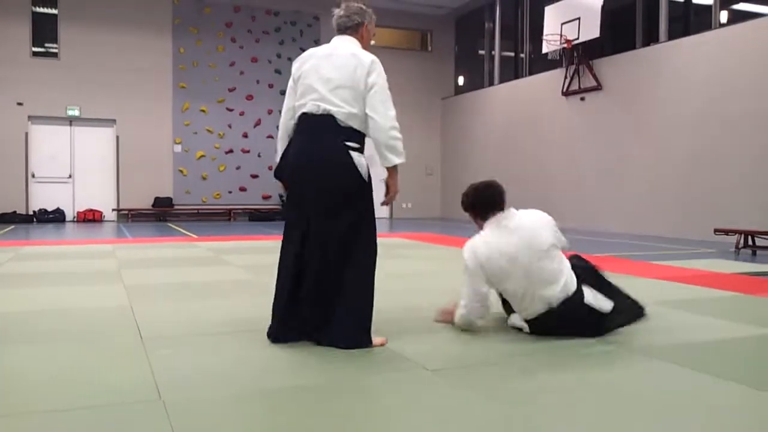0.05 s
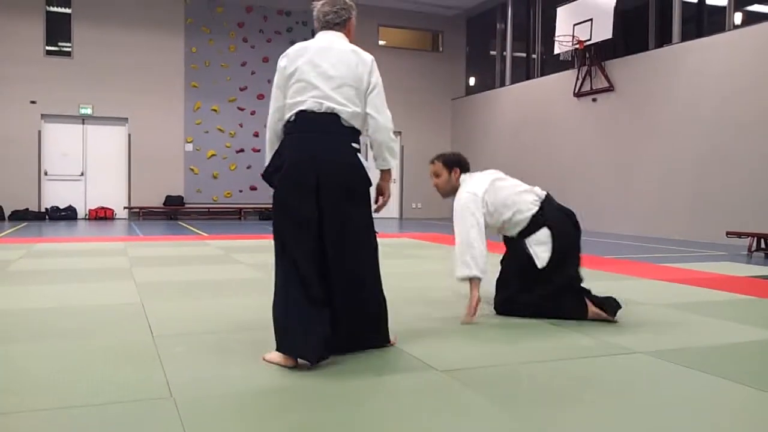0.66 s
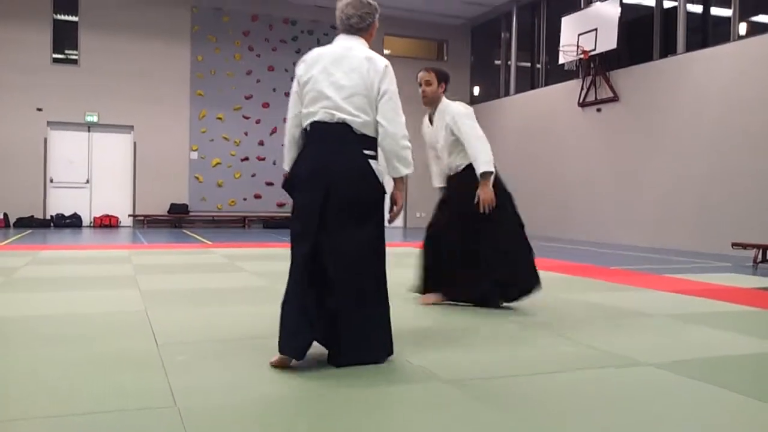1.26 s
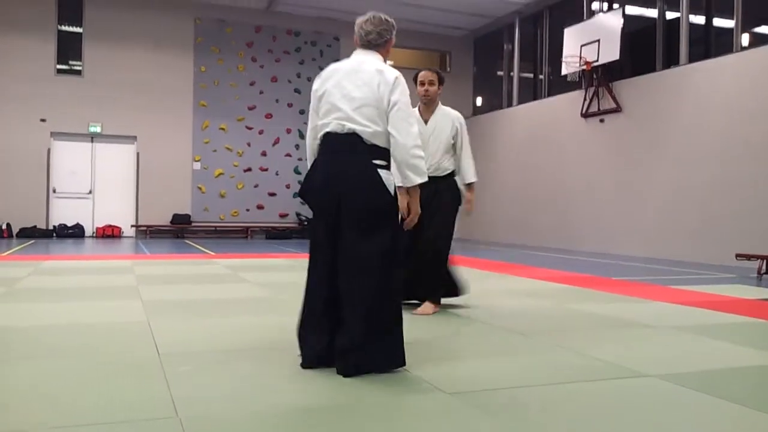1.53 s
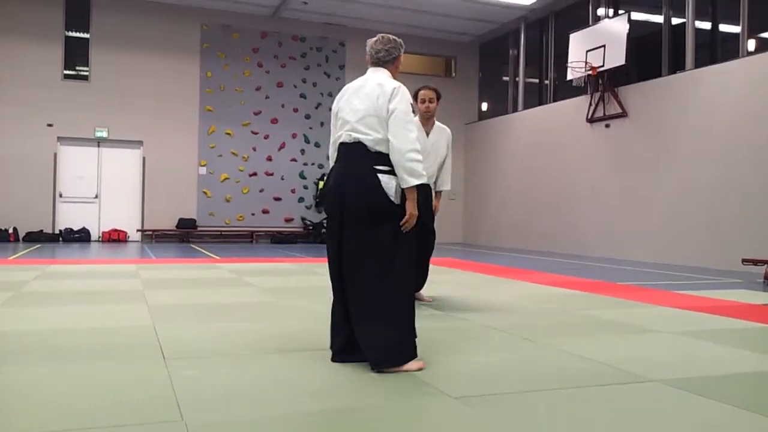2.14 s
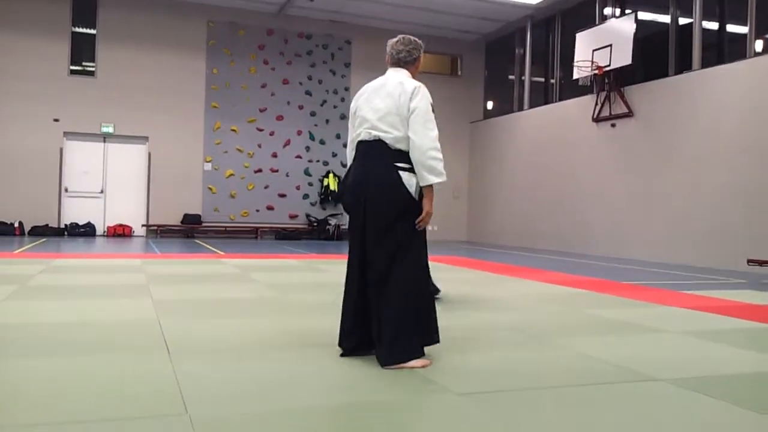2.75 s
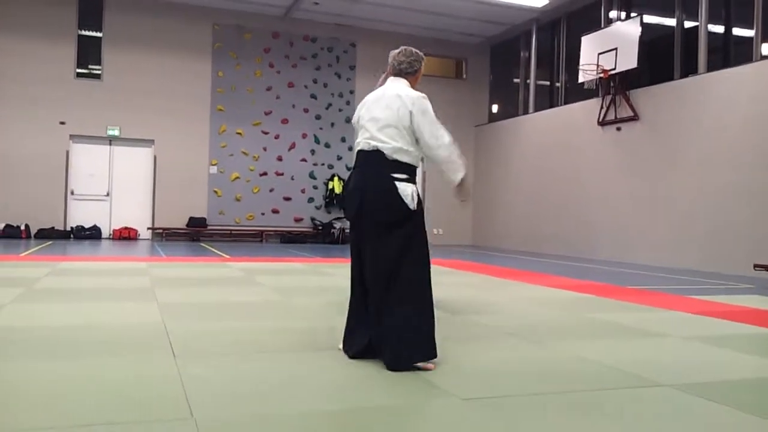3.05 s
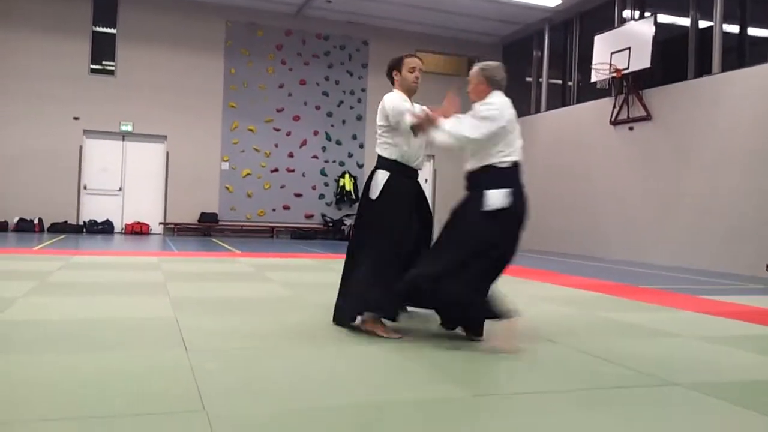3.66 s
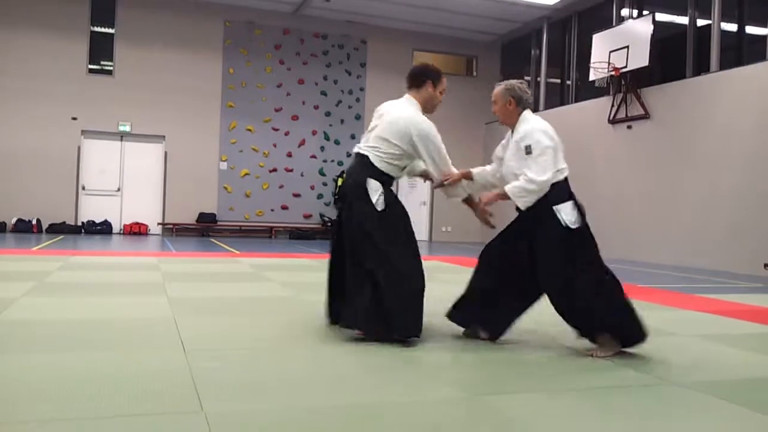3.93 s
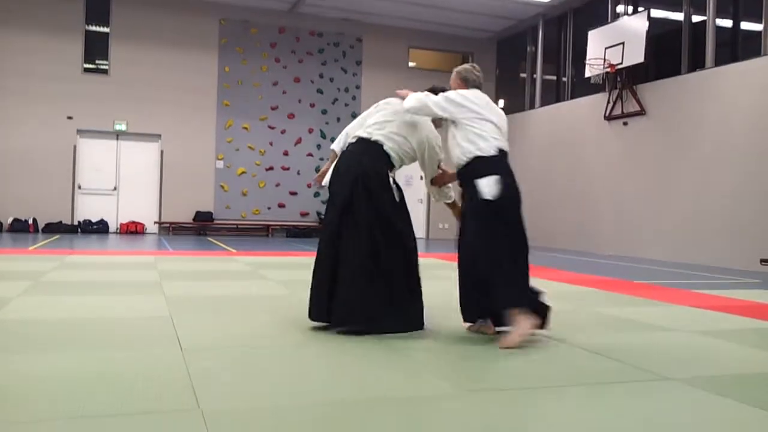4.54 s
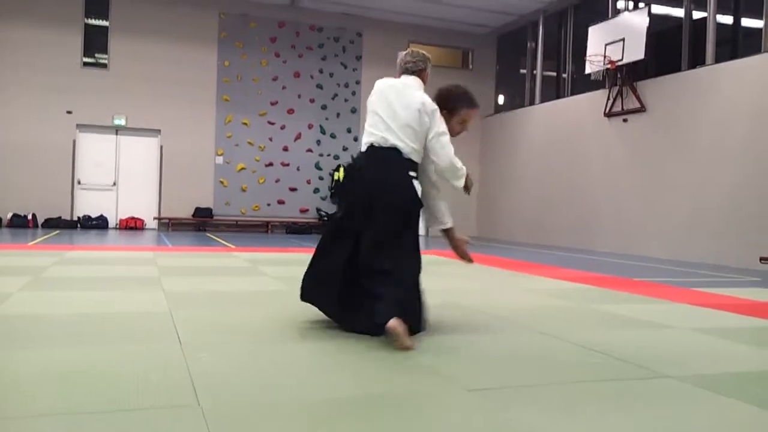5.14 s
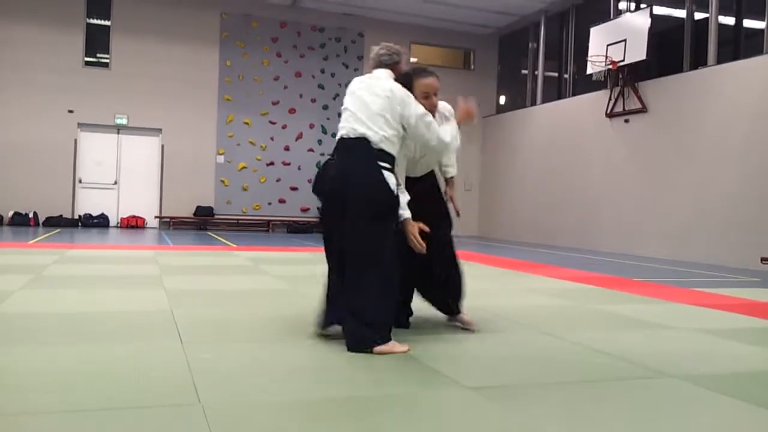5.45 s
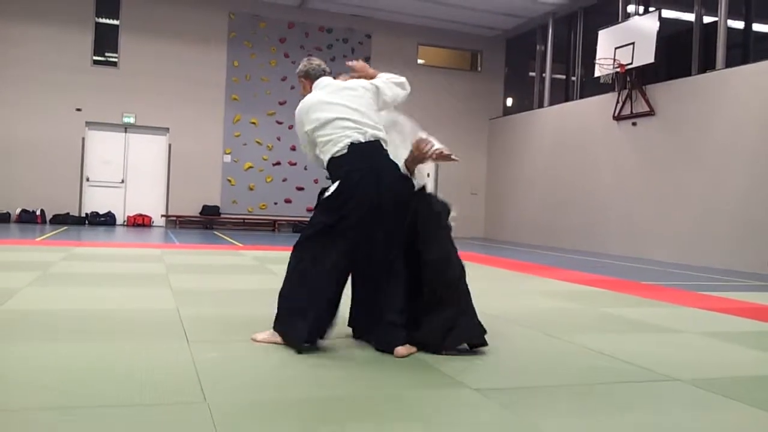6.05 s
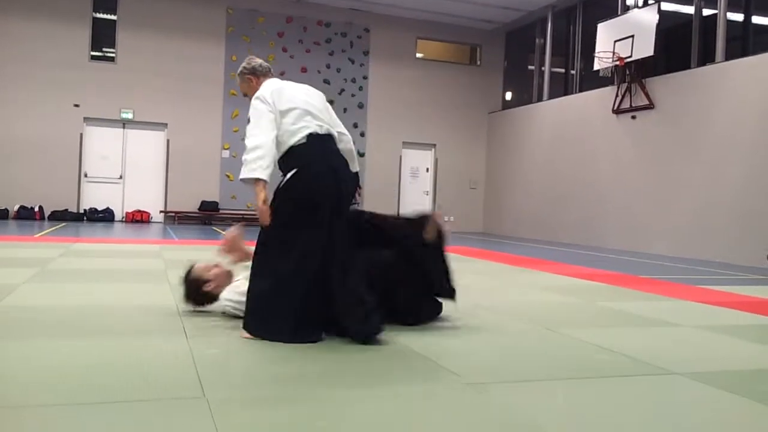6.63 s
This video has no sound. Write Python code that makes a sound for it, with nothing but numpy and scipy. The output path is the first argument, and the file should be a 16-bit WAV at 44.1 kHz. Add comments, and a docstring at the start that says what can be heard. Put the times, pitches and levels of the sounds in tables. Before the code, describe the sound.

Loose cloth swishes, bare feet scuff and bodies thud softly on mats as two people move and roll in a sports hall.

```python
"""A sports hall, where two people in loose training clothes move and roll on mats.
Sliding friction makes cloth swish and bare feet scuff; impacts give sharp ticks and soft thuds.
Beneath them lie the hiss of the ventilation and a rumble that swells as the bodies roll.
The two microphone ports of a hand-held camera colour it by resonance: the left one rings in the
top treble, the right one lower."""
import sys
import numpy as np
from scipy import signal
from scipy.fft import rfft, irfft, next_fast_len
from scipy.io import wavfile
from scipy.ndimage import uniform_filter1d, map_coordinates

SR = 44100
rng = np.random.default_rng(int(sys.argv[2]) if len(sys.argv) > 2 else 0)


def generate_wav(signal):
    """Clip the signal to [-1, 1] and save it as 16-bit WAV at the path in sys.argv[1]."""
    frames = np.transpose(np.atleast_2d(signal))
    scaled = np.clip(frames, -1, 1) * 32767
    pcm = np.round(scaled).astype(np.int16)
    wavfile.write(sys.argv[1], SR, pcm)


N = 299394
TIME = np.arange(N) / SR
# spectrum of a tick or a snapping crease: f/Hz, level/dB
CRACK_SPECTRUM = [(60, -15), (300, -7), (600, -2), (1200, -0.5), (2500, -1.5), (4000, -1), (5200, 5.5),
                  (7000, -2.5), (11300, 2), (14000, -1)]


def amp(db):
    """Amplitude ratio of a level in decibels."""
    return 10 ** (np.asarray(db) / 20)


def unit(x):
    """Normalisation to an rms of 1."""
    return x / np.sqrt(np.mean(x ** 2) + 1e-20)


def along(points, hz):
    """Interpolation of (f/Hz, value) points on a logarithmic frequency axis."""
    f, values = np.transpose(points)
    return np.interp(np.log(hz + 1), np.log(f), values)


def wobble(rate):
    """Random modulation: a smooth curve with rate knots a second."""
    return map_coordinates(rng.standard_normal(int(N * rate / SR) + 4), [TIME * rate])


def filtered(x, response):
    """Zero-phase filtering: the spectrum of x times a frequency response."""
    size = next_fast_len(N + SR // 2)
    return irfft(rfft(x, size) * response(np.fft.rfftfreq(size, 1 / SR)), size)[..., :N]


def coloured(x, points, size=4096):
    """Minimum-phase filtering by an (f/Hz, gain/dB) curve: ringing follows its cause."""
    gain = amp(along(points, np.fft.rfftfreq(size, 1 / SR)))
    cepstrum = irfft(np.log(gain))
    cepstrum[1:size // 2] *= 2
    cepstrum[size // 2 + 1:] = 0
    impulse_response = irfft(np.exp(rfft(cepstrum)))
    return signal.oaconvolve(x, impulse_response)[:N]


def gate(start, length, rise, fall):
    """Envelope of a sustained excitation: linear rise, plateau, exponential decay."""
    t = TIME - start
    return np.clip(t / rise + .5, 0, 1) * np.exp(-np.maximum(t - length, 0) / fall)


def blow(start, t60):
    """Envelope of a damped impact: a sudden onset, then 60 dB of decay in t60 seconds."""
    t = TIME - start
    return (t >= 0) * amp(-60 * np.clip(t / t60, 0, 2))


def sweep(start, rise, hold, fall):
    """Level follows speed: a movement gathers pace, slows a little and comes to rest."""
    flank_db, flank_bend, sag_db_per_s = 15, 1.16, 3.5
    t = TIME - start
    flanks = np.maximum(-t, 0) / rise + np.maximum(t - hold, 0) / fall
    return amp(-flank_db * np.minimum(flanks, 10) ** flank_bend - sag_db_per_s * np.clip(t, 0, hold))


def glide(rows, unsteady, wobble_rate, flicker_db):
    """Random frequency and amplitude modulation roughen a tone along (t/s, f/Hz, level/dB) rows."""
    times, pitches, levels = np.transpose(rows)
    hz, db = np.interp(TIME, times, pitches), np.interp(TIME, times, levels)
    phase = 2 * np.pi * np.cumsum(hz * (1 + unsteady * wobble(wobble_rate))) / SR
    sounding = gate(times[0], times[-1] - times[0], rise=0.026, fall=0.022)
    return sounding * amp(db + flicker_db * wobble(45)) * np.sin(phase)


def ports(pair):
    """Cavity resonance: the left microphone port peaks near 11 kHz, the right near 5 kHz."""
    # responses of the ports: f/Hz, gain/dB
    left_response = [(200, 2.5), (600, 0.5), (2000, -0.5), (4200, 1), (5500, -3.5), (7000, 3), (8500, 8),
                     (10000, 13.5), (11300, 19), (12500, 14), (14500, 8.5)]
    right_response = [(200, -2.5), (600, 0), (2000, 0), (3000, 1.5), (4200, 5.5), (5300, 6), (6100, 1.5),
                      (7000, -1.5), (10000, -2.5), (14500, -4)]
    return np.array([coloured(pair[0], left_response), coloured(pair[1], right_response)])


def rush(spectrum, grain=1):
    """Partial coherence: noise of rms 1 at the two ports, its amplitude modulated by grain."""
    # opposed in the bass, only weakly related in the top treble: f/Hz, left-right correlation
    correlation = [(60, -0.55), (200, -0.84), (550, -0.57), (900, -0.25), (2000, -0.4), (4000, -0.41),
                   (5500, 0.57), (7000, 0.21), (10500, -0.11), (14000, -0.31)]

    def mid_side_gains(hz):
        angle = np.arccos(np.clip(along(correlation, hz), -1, 1)) / 2
        return amp(along(spectrum, hz)) * np.array([np.cos(angle), np.sin(angle)])

    mid, side = filtered(grain * rng.standard_normal((2, N)), mid_side_gains)
    return unit(ports([mid + side, mid - side]))


def self_noise():
    """White noise of the microphones themselves, uncoloured by the ports."""
    return amp([[-42], [-39]]) * rng.standard_normal((2, N))


def ventilation():
    """Flow noise: moving air gives a nearly steady broadband hiss."""
    # spectrum of the air flow: f/Hz, level/dB
    air_spectrum = [(200, 8), (700, 3.5), (1200, 5), (2500, 7), (4000, 1), (5200, 5.5), (7000, -14.5),
                    (11000, -8.5), (14500, -6.5)]
    return amp(-37.5 + wobble(14)) * rush(air_spectrum)


def rumble():
    """Incoherent sources add in power: the hall's low rumble and bodies rolling on the mats."""
    # shifts of weight: t/s at full weight, rise/s, hold/s, fall/s, level/dB
    rolls = [(0.15, 0.079, 0.041, 0.12, -29.5), (0.938, 0.14, .05, 0.34, -33),
             (1.27, 0.035, 0.038, 0.23, -34.5), (3.813, 0.71, 0.034, 0.25, -34),
             (4.07, 0.051, 0.028, 0.23, -32), (6.175, 0.17, 0.42, 0.35, -35), (6.56, 0.055, .03, 0.25, -30)]
    # spectrum of the rumble: f/Hz, level/dB
    low_spectrum = [(20, -25), (50, -12), (110, -12), (160, -3), (220, 0.5), (340, -2), (520, -0.5),
                    (750, -4.5), (1100, -7.5), (2000, -11.5), (5000, -52)]
    hall_db = -35
    rolling_power = sum((amp(db) * sweep(*timing)) ** 2 for *timing, db in rolls)
    return np.sqrt(amp(hall_db) ** 2 + rolling_power) * rush(low_spectrum)


def whistles():
    """Slight frequency modulation makes faint treble glides waver, mostly on the left."""
    # one path for each whistle: t/s, f/Hz, level/dB
    paths = [
        [(2.31, 11100, -42), (2.355, 11500, -34), (2.39, 12500, -38), (2.47, 12900, -43), (2.55, 13000, -39),
         (2.61, 12400, -40)],
        [(2.78, 10700, -39), (2.88, 11300, -36.5), (2.97, 11750, -37.5), (3.03, 11450, -40)],
        [(2.76, 13300, -48), (2.84, 12950, -46), (2.97, 13150, -47), (3.05, 12400, -47)],
    ]
    tone = sum(glide(path, unsteady=.008, wobble_rate=550, flicker_db=2.5) for path in paths)
    return tone * amp([[0], [-16]])


def groans():
    """Friction of bodies dragging over the mats gives uneven low tones, in antiphase at the ports."""
    # one path for each groan: t/s, f/Hz, level/dB
    paths = [
        [(.13, 271.3, -37), (.21, 226, -23.5), (.3, 214.8, -34), (.45, 205.3, -37), (.55, 207, -34),
         (.63, 205, -37.5), (.7, 203, -40)],
        [(6.6, 200, -33), (6.64, 215, -35), (6.68, 213, -40)],
    ]
    tone = sum(glide(path, unsteady=.11, wobble_rate=140, flicker_db=3) for path in paths)
    return np.array([amp(3.5) * tone, -amp(-3) * tone])


def thuds():
    """Damped vibration: a struck mat gives a rough, hollow note and expels a dull puff of air."""
    # contacts of feet, hands and bodies: t/s, level/dB, f/Hz, T60/s
    contacts = [(.122, -25, 292, 0.11), (1.227, -29, 560, .07), (1.253, -25, 602, .08),
                (1.269, -23, 520, 0.07), (1.612, -21, 402, 0.05), (2.69, -26, 602, .08),
                (3.111, -27, 454, .04), (3.47, -24.5, 538, 0.35), (3.705, -28, 538, .12),
                (3.812, -26, 250, .1), (4.08, -31, 231, .08), (4.868, -22, 549, 0.035),
                (5.698, -17.5, 500, 0.039), (6.055, -21, 557, .05), (6.124, -18, 320, 0.061),
                (6.166, -24, 271, 0.17), (6.222, -23, 480, .055), (6.278, -27, 517, .07),
                (6.346, -23, 259, 0.11), (6.366, -21.5, 490, 0.16), (6.538, -21.5, 497, .11),
                (6.575, -25, 330, .1)]
    # spectrum of the puff: f/Hz, level/dB
    puff_spectrum = [(30, 0), (55, 2), (120, -2), (240, 4), (330, -4), (470, 9), (700, -7), (1000, -16),
                     (2500, -10), (8000, -50)]
    rise_s, puff_db = 0.0022, -8  # the padding softens each onset
    notes, puffs = np.zeros(N), np.zeros(N)
    for start, db, hz, t60 in contacts:
        envelope = amp(db) * blow(start, t60) * np.clip((TIME - start) / rise_s, 0, 1)
        phase = 2 * np.pi * np.cumsum(hz * (1 + .25 * wobble(hz))) / SR
        notes += envelope * np.sin(phase)
        puffs += envelope
    antiphase = np.array([[amp(3.5)], [-amp(-1)]])
    return notes * antiphase + amp(puff_db) * puffs * rush(puff_spectrum)


def crackle():
    """Buckling: stiff creases snap at random while a jacket is gripped."""
    snaps_per_s = 65
    snaps = (rng.random(N) < snaps_per_s / SR) * rng.standard_normal((2, N))
    grip = amp(-25) * gate(start=5.6, length=0.27, rise=.1, fall=.2)
    return ports([coloured(channel, CRACK_SPECTRUM) for channel in grip * snaps])


def ticks():
    """Impulse excitation: tiny cracks, each a spike and a brief splutter, set the ports ringing."""
    # ticks close to the camera: t/s, left level/dB, right level/dB, T60/s
    hits = [(0.089, -10, -22, 0.0025), (0.785, -27, -22, .008), (2.034, -11.5, -26, 0.005),
            (2.607, -24, -33, 0.005), (3.11, -20, -17.5, 0.005), (3.413, -21, -26, .004),
            (3.891, -8.5, -23, 0.0054), (4.391, -26, -34, 0.0054), (4.811, -8, -20, .008),
            (4.8664, 1, 18, 0.0042), (5.651, -25, -15, .004), (5.6733, -5, -11, 0.0039),
            (5.6978, -6.5, -7.5, 0.012), (5.7022, -24, -14, 0.0033), (5.78, -22, -29, 0.0046),
            (6.13, -24, -17, 0.0034), (6.3485, -8, -19, .004)]
    envelope = sum(amp([[left], [right]]) * blow(start, t60) for start, left, right, t60 in hits)
    spikes = amp(8.5) * np.maximum(np.diff(envelope, axis=1, prepend=0), 0)
    splutter = amp(-2) * envelope * rng.standard_normal((2, N))
    cracks = amp([[-5], [-1]]) * (spikes + splutter)
    return ports([coloured(channel, CRACK_SPECTRUM) for channel in cracks])


def zips():
    """Periodic friction: cloth weave sliding fast rasps at a pitch set by its speed."""
    # one path for each fast slide: t/s, f/Hz, level/dB
    paths = [
        [(1.172, 8700, -19), (1.183, 9100, -18), (1.198, 8900, -19)],
        [(1.282, 9450, -16), (1.293, 8750, -20), (1.312, 7400, -27)],
    ]
    rasp = sum(glide(path, unsteady=.05, wobble_rate=2500, flicker_db=1.5) for path in paths)
    return rasp * amp([[0], [-17]])


def weave(catches_per_s, catch_size, flutter_db, fold_db):
    """Uneven friction modulates the amplitude: threads catch, the weave flutters, folds pass."""
    catches = (rng.random(N) < catches_per_s / SR) * rng.random(N)
    return (1 + catch_size * catches) * amp(flutter_db * wobble(420) + fold_db * wobble(55))


def shifting(pair, patchy_db):
    """Time-varying filtering: changing folds give every stroke a colour of its own."""
    spectra = signal.stft(pair, nperseg=512)[2]
    patches = uniform_filter1d(rng.standard_normal(spectra.shape), size=5, axis=1)  # over frequency
    patches = uniform_filter1d(patches, size=6, axis=2)  # over time
    gain = amp(patchy_db * np.minimum(unit(patches), 1))
    return unit(signal.istft(spectra * gain, nperseg=512)[1][:, :N])


def lingering(power, wet_db, t60_s=0.96):
    """Reverberation: the amplitude of a noise of given power, with the hall's exponential decay added."""
    retained = amp(-60 / (t60_s * SR)) ** 2
    reverberant_power = signal.lfilter([1 - retained], [1, -retained], power)
    return np.sqrt(power + amp(wet_db) ** 2 * reverberant_power)


def swishes_and_scuffs():
    """Friction noise of cloth and feet: a fine sheen over a coarser rub, at times with a ringing hiss."""
    # sweeps of a leg or sleeve: t/s at full speed, rise/s, hold/s, fall/s, sheen level/dB, rub level/dB
    swishes = [(0.12, 0.025, 0.2, 0.035, -10, -20), (0.168, 0.079, 0.041, 0.053, -26, -14.5),
               (0.336, 0.026, 0.073, 0.068, -13, -21), (0.891, 0.041, .02, .03, -22.5, -28),
               (0.95, 0.038, 0.043, 0.078, -9.5, -20.5), (1.099, 0.038, 0.018, 0.038, -17.5, -20),
               (1.175, 0.015, 0.023, 0.0088, -5, -44), (1.246, .02, 0.0089, .012, -15, -27),
               (1.396, 0.073, 0.028, 0.087, -12, -21), (1.479, 0.16, 0.072, 0.089, -13, -19.5),
               (1.69, 0.053, 0.083, 0.047, -29, -43), (1.703, 0.036, 0.0071, 0.0071, -14, -24),
               (1.922, 0.035, 0.025, 0.14, -21, -63), (2.654, 0.042, 0.069, 0.065, -22, -45),
               (3.016, 0.027, 0.056, 0.038, -27.5, -59), (3.22, 0.026, 0.046, 0.072, -25.5, -33.5),
               (3.471, 0.01, 0.037, 0.068, -11.5, -23), (3.726, 0.028, 0.029, 0.068, -8.5, -26.5),
               (3.792, 0.023, 0.015, 0.036, -9.5, -25), (3.85, 0.068, 0.024, 0.45, -30, -27.5),
               (4.033, 0.089, 0.097, 0.045, -31, -44), (4.066, 0.029, 0.006, 0.01, -28, -21),
               (4.505, .03, 0.04, .03, -14.5, -24), (4.569, 0.061, 0.043, 0.056, -9.5, -17),
               (4.756, 0.067, 0.21, 0.13, -42, -34), (4.986, 0.054, 0.037, 0.12, -5, -20.5),
               (5.142, 0.03, 0.012, 0.081, -12, -23), (5.234, 0.2, 0.35, .08, -48, -31),
               (5.439, 0.048, 0.038, 0.028, -6.5, -23), (5.61, 0.013, 0.0072, 0.013, -23, -27.5),
               (5.85, 0.09, 0.03, 0.06, -25.5, -38), (6.053, 0.076, .01, 0.042, -18.5, -30),
               (6.138, .04, 0.025, 0.14, -21, -33.5), (6.347, 0.029, 0.0069, 0.016, -9.5, -31),
               (6.368, .04, 0.02, 0.094, -30, -32), (6.554, 0.015, 0.026, .07, -12, -25.5),
               (6.645, 0.045, 0.068, 0.11, -10, -22.5), (6.753, 0.013, 0.029, .1, -5.5, -18.5)]
    # quick scuffs: t/s, length/s, sheen level/dB, rub level/dB
    scuffs = [(1.206, .006, -9, -30), (1.265, 0.011, -6.5, -25), (1.292, 0.024, -12, -21.5),
              (1.716, 0.01, -9, -17), (2.03, .002, -15, -32), (2.113, 0.05, -11.5, -24.5),
              (2.114, 0.0081, -9, -32), (2.683, 0.024, -21, -29), (3.102, 0.0062, -25, -31),
              (3.408, 0.021, -32, -28), (3.457, .007, -11.5, -27), (3.649, .006, -14.5, -32),
              (3.666, 0.011, -15, -31.5), (3.707, 0.016, -10, -27), (4.472, 0.075, -14.5, -25),
              (4.809, 0.045, -13, -23.5), (5.737, .012, -25, -40), (6.538, 0.022, -17, -23.5)]
    # strokes with a narrow ringing hiss near 5 kHz: t/s at the peak, Gaussian half width/s, level/dB
    ringing_strokes = [(0.35, 0.036, -25), (1.17, .013, -24), (1.289, 0.015, -14.5), (1.723, .006, -19),
                       (2.148, 0.023, -21.5), (2.7, .018, -33), (3.11, .006, -31), (4.065, 0.0056, -16.5),
                       (4.624, 0.025, -15), (4.83, 0.015, -19.5), (5.031, 0.047, -10.5),
                       (5.455, 0.015, -17), (6.687, 0.089, -22.5), (6.78, 0.02, -19)]
    # spectra of the three noises: f/Hz, level/dB
    sheen_spectrum = [(2000, -68), (4000, -1.5), (7000, -6.5), (9000, -1), (12000, 1.5), (14500, -1.5)]
    rub_spectrum = [(100, -21), (500, -8.5), (1200, -9.5), (2000, -4), (3400, 1), (5500, -1.5), (7000, -8),
                    (10000, -9), (14500, -18)]
    ring_spectrum = [(1500, -48), (3500, -15), (4600, 3.5), (5200, 1), (6200, -0.5), (8000, -8),
                     (14000, -10.5)]
    strokes = [(sweep(*timing), sheen_db, rub_db) for *timing, sheen_db, rub_db in swishes]
    strokes += [(gate(*timing, rise=.0055, fall=.0098), sheen_db, rub_db)
                for *timing, sheen_db, rub_db in scuffs]
    strokes += [(amp(1.2 * wobble(5.52)), -46, -39.5)]  # the clothes are never quite still
    sheen = lingering(sum((amp(db) * shape) ** 2 for shape, db, _ in strokes), wet_db=-12.5)
    rub = lingering(sum((amp(db) * shape) ** 2 for shape, _, db in strokes), wet_db=-2)
    ring = sum(amp(db) * np.exp(-((TIME - t) / width) ** 2 / 2) for t, width, db in ringing_strokes)
    grain = weave(catches_per_s=650, catch_size=2.4, flutter_db=0.3, fold_db=0.76)
    fine = amp(-4.5) * sheen * shifting(rush(sheen_spectrum, grain), patchy_db=0.9)
    coarse = amp(-1.17) * rub * shifting(rush(rub_spectrum, grain), patchy_db=4.5)
    return fine + coarse + ring * rush(ring_spectrum, grain)


def scene():
    """Superposition of all the sources at the two microphones."""
    movement = swishes_and_scuffs() + zips() + ticks() + crackle() + thuds() + groans()
    return movement + whistles() + rumble() + ventilation() + self_noise()


def ducked(x, edge_hz, threshold_db, steepness):
    """Compression of one band: all below the edge falls as the left rms level passes the threshold."""
    power = uniform_filter1d(x[0] ** 2, size=3600, origin=700, mode="constant")
    left_rms = np.sqrt(np.abs(power))
    lows = filtered(x, lambda hz: 1 / (1 + (hz / edge_hz) ** 6))
    return x - lows / (1 + (amp(threshold_db) / (left_rms + 1e-6)) ** steepness)


def record(dry):
    """The camera saturates, thins deep bass when loud and the middle when loudest, and limits the band."""
    top_hz = 14620
    clipped = dry / (1 + np.abs(dry) ** 12) ** (1 / 12)
    thinned = ducked(clipped, edge_hz=70, threshold_db=-14.5, steepness=6.3)
    thinned = ducked(thinned, edge_hz=1500, threshold_db=-7.8, steepness=11)
    return filtered(thinned, lambda hz: hz < top_hz)


dry = scene()
out = record(dry)
generate_wav(out)
```